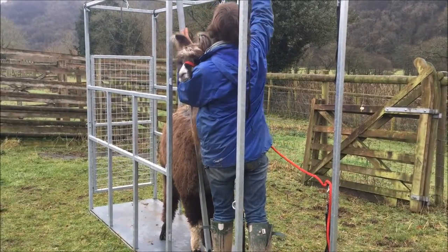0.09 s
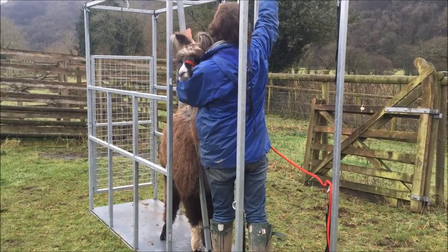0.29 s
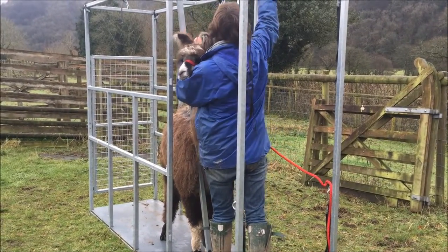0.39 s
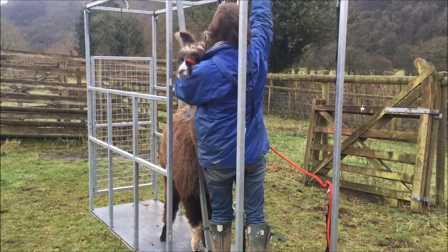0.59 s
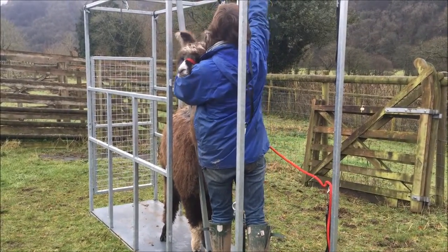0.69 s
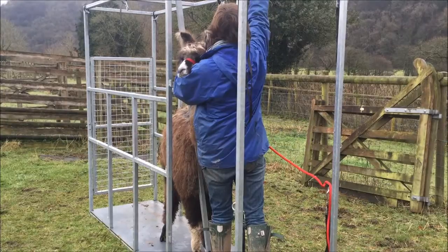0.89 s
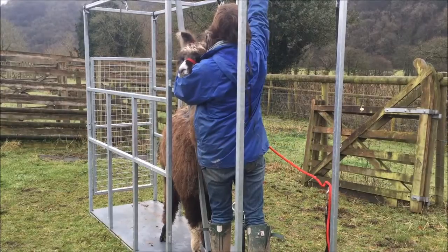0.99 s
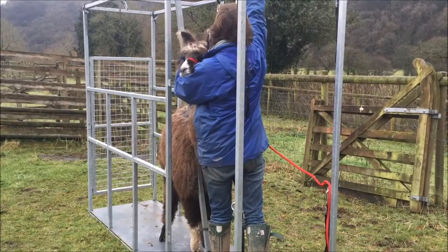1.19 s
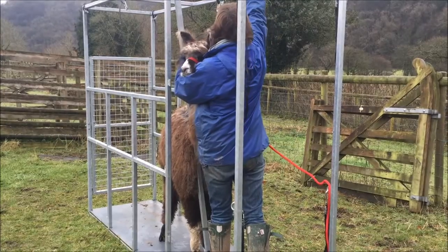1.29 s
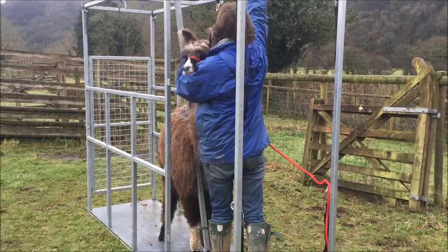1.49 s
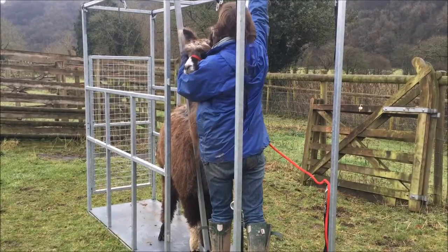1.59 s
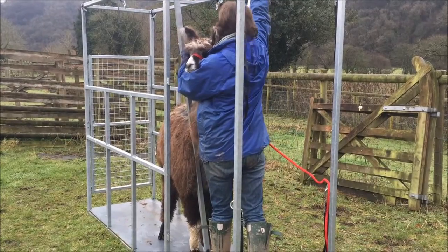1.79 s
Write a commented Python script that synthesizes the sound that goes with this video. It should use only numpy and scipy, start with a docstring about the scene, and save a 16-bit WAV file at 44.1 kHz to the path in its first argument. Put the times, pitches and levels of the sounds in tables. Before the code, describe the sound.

A steel bar scrapes briefly, slams with a hard bright clank and clatters back, the tubular frame ringing on; later soft knocks and a dull scrape with a faint squeal, in a breezy open field, close microphone.

```python
"""A field with a galvanised steel livestock chute, an animal shifting inside: breeze and far-off bird behind.
A bar scrapes along, slams home and clatters back; a cluster of pure tones swells with the slam and fades, and
the frame rings on. Light knocks and a duller scrape with a thin squeal follow. Steel is random contact impulses
through coloured filters and decaying sine modes; the breeze is filtered noise, the bird falling sine whistles."""
import sys
import numpy as np
from scipy import signal
from scipy.io import wavfile
from scipy.ndimage import uniform_filter1d

SR = 44100
rng = np.random.default_rng(int(sys.argv[2]) if len(sys.argv) > 2 else 0)


def wrap_up_sound(samples):
    """Save the sound to the file named by the first command line argument, as 16-bit audio."""
    columns = np.atleast_2d(samples).T
    # keep every value between -1 and 1, then stretch to whole-number steps
    tamed = np.clip(columns, -1, 1)
    steps = np.round(tamed * 32767).astype(np.int16)
    wavfile.write(sys.argv[1], SR, steps)


N = 79380
T = np.arange(N) / SR
HZ = np.fft.rfftfreq(4096, 1 / SR)
SLIPS_PER_S, SLIP_SPREAD_DB = 2800, 3

# Steel-on-steel blows: start_s, rise_s, hold_s, release_t60_s, level_db, rest_after_s
SLAM_BLOW = (.2166, .002, .009, .06, -13.3, .0205)
REBOUND_BLOW = (.246, .010, .007, .14, -22.3, .081)
# Short resonances of the struck parts: resonance_hz, slam_lift_db, rattle_lift_db
PART_RESONANCES = [(355, 9, 8), (680, 13, 13), (1635, 2, 7), (1895, 10, 2), (2385, 7, 10), (2860, 7, 1),
                   (3315, 6, 12), (3720, 9, 10), (4870, 2, 9), (5280, 11, 8), (5870, 10, 0), (6930, 8, 9),
                   (7410, 10, 10), (7960, 5, 10), (8440, 11, 9), (9590, 11, 9), (9810, 8, 2)]
# Frame modes: mode_hz, struck_level_db, struck_t60_s, scraped_relative_db
FRAME_MODES = [(163, -44, .5, -2), (366, -45, .55, -1), (411, -55, 1.3, -7), (590, -47, .3, -6),
               (974, -54, .5, 2), (1100, -58, .25, 3), (1236, -48, .4, 2), (1330, -44, .47, -10),
               (2051, -52, .2, 2), (2719, -42, .46, -20), (3219, -48, .42, -3), (3424, -54, .3, -5),
               (6660, -50, .5, -19), (6729, -49, .65, -17), (9448, -45, .38, -21), (9708, -51, .35, -17),
               (10401, -50, .4, -34)]


def amp(db):
    """Decibels to gain."""
    return 10 ** (np.asarray(db) / 20)


def unit(x):
    """Scales to rms 1."""
    return x / np.sqrt(np.mean(x ** 2) + 1e-20)


def read(points):
    """Spectrum in dB, interpolated on a log-frequency axis."""
    hz, db = np.transpose(points)
    return np.interp(np.log(HZ + 1), np.log(hz + 1), db)


def level(points):
    """Level curve (s, dB) as gain over the whole scene."""
    return amp(np.interp(T, *np.transpose(points)))


def colour(x, db):
    """Causal minimum-phase filter of energy 1: only the shape of the spectrum counts."""
    log_gain = np.log(amp(np.maximum(db - db.max(), -90)))
    mirrored = np.r_[log_gain, log_gain[-2:0:-1]]
    taps = np.fft.ifft(np.exp(np.conj(signal.hilbert(mirrored)))).real
    return signal.fftconvolve(x, taps / np.linalg.norm(taps))[:N]


def peak(hz, width_hz, db):
    """Lift in dB of one resonance."""
    return db / (1 + (2 * (HZ - hz) / width_hz) ** 2)


def crowded(depth_db):
    """Many close modes of a welded frame, as a random ripple on a spectrum in dB."""
    ripple = uniform_filter1d(rng.standard_normal(len(HZ)), size=4)
    return depth_db * np.tanh(unit(uniform_filter1d(ripple, size=3)))


def flutter(depth_db):
    """Gain that wavers at random."""
    waver = uniform_filter1d(rng.standard_normal(N), size=400)
    return amp(depth_db * unit(uniform_filter1d(waver, size=300)))


def contacts(per_s, spread_db):
    """Dense random train of tiny impacts of uneven size and random sign, rms 1."""
    size = amp(spread_db * np.minimum(rng.exponential(1, N), 3))
    sign = rng.choice([-1, 1], N)
    return unit(size * sign * (rng.random(N) < per_s / SR))


def decay(t_s, t60_s):
    """Exponential decay by 60 dB in t60_s."""
    return np.exp(-np.log(1000) * t_s / t60_s)


def envelope(start_s, rise_s, hold_s, t60_s, db):
    """Linear attack, hold and exponential release."""
    t = T - start_s
    return np.clip(t / rise_s, 0, 1) * amp(db) * decay(np.maximum(t - rise_s - hold_s, 0), t60_s)


def tone(hz):
    """One mode: a sine at random phase."""
    return np.sin(2 * np.pi * (hz * T + rng.random()))


def field():
    """Breeze: faint open-air hiss and an uneven low rumble, both filtered noise."""
    # Spectra: frequency_hz, relative_density_db_per_hz
    air_colour = [(100, -5), (170, -3), (260, -10), (420, -10), (520, -15), (950, -11.5), (1500, -14),
                  (3200, -23.5), (5000, -27.5), (15500, -36)]
    rumble_colour = [(20, -36), (35, -14), (55, 0), (110, -5), (170, -7), (240, -18), (500, -34),
                     (3000, -85)]
    # Rumble level: time_s, level_db
    rumble_level = [(0, -54), (.13, -60), (.28, -51), (.52, -56), (.58, -63), (.745, -65), (.775, -55),
                    (1.0, -57), (1.09, -63), (1.13, -58), (1.28, -57), (1.34, -65), (1.8, -61)]
    air_db = -64.5
    air = amp(air_db) * colour(rng.standard_normal(N), read(air_colour))
    return air + level(rumble_level) * colour(rng.standard_normal(N), read(rumble_colour))


def bird(waver=.016):
    """Thin whistles that swell, fall in pitch and fade."""
    # Whistles: start_s, length_s, start_hz, end_hz, level_db
    whistles = [(.87, .1, 7400, 6150, -68), (1.005, .065, 3650, 3100, -69), (1.035, .1, 7400, 5500, -69),
                (1.198, .1, 6850, 5400, -71)]
    bend = 1.15  # above 1, the fall steepens towards the end
    out = np.zeros(N)
    for start_s, length_s, from_hz, to_hz, db in whistles:
        u = np.clip((T - start_s) / length_s, 0, 1)
        glide_hz = from_hz + (to_hz - from_hz) * u ** bend
        wobble = unit(uniform_filter1d(rng.standard_normal(N), size=120))
        hz = glide_hz * (1 + waver * wobble)
        swell = amp(db) * flutter(depth_db=2.5) * np.sin(np.pi * u)
        out += swell * np.sin(2 * np.pi * np.cumsum(hz) / SR)
    return out


def knocks():
    """Small bumps against the chute, each favouring one resonance."""
    # Bumps: start_s, rise_s, hold_s, release_t60_s, level_db, resonance_hz, width_hz, lift_db
    bumps = [(1.173, .005, .01, .09, -55, 3500, 1900, 15), (1.192, .012, .02, .14, -56, 400, 220, 23),
             (1.193, .008, .015, .13, -60, 1400, 140, 19), (1.5932, .0005, .002, .08, -43.5, 1100, 900, 12),
             (1.708, .012, .01, .09, -51.5, 900, 1600, 5)]
    # Spectrum: frequency_hz, relative_density_db_per_hz
    bump_colour = [(100, -8), (400, -2), (1200, -3), (2200, -7), (4200, -15), (5200, -27), (15000, -44)]
    out = np.zeros(N)
    for *shape, hz, width_hz, lift_db in bumps:
        impacts = contacts(SLIPS_PER_S, SLIP_SPREAD_DB) * envelope(*shape)
        out += colour(impacts, read(bump_colour) + peak(hz, width_hz, lift_db))
    return out


def squeal():
    """The second scrape sings thinly, as one wavering tone, while it presses hardest."""
    # Shape: start_s, rise_s, hold_s, release_t60_s, level_db
    squeal_shape = (1.535, .03, .135, .1, -68)
    return tone(hz=4545) * envelope(*squeal_shape) * flutter(depth_db=2)


def scrape(force, spectrum, ring_db, tilt_db_per_octave, ring_t60_s, bite):
    """Tiny slips rasp and excite the damped frame; more bite makes it ring only when pressed hard."""
    push = level(force)
    slips = contacts(SLIPS_PER_S, SLIP_SPREAD_DB) * push
    modes = sum(amp(db + tilt_db_per_octave * np.log2(hz)) * tone(hz) for hz, _, _, db in FRAME_MODES)
    ring = modes * decay(T, ring_t60_s)
    drive = slips * (push / push.max()) ** bite
    ringing = signal.fftconvolve(drive, ring / np.linalg.norm(ring))[:N]
    rasp = colour(slips, read(spectrum) + crowded(depth_db=5.5))
    return rasp + amp(ring_db) * ringing


def scrapes():
    """The bar scrapes in before the slam; a duller scrape comes later."""
    # Force: time_s, level_db
    in_force = [(.085, -84), (.123, -56), (.143, -57), (.167, -47.5), (.183, -51), (.197, -47), (.215, -46),
                (.25, -100)]
    back_force = [(1.25, -76), (1.47, -65), (1.52, -56), (1.56, -54), (1.615, -51.5), (1.655, -53),
                  (1.69, -58), (1.8, -57)]
    # Spectra: frequency_hz, relative_density_db_per_hz
    in_colour = [(50, -20), (200, -7), (375, 1), (524, -8), (760, -2), (2700, -13), (3600, -9), (5040, -23),
                 (15000, -35)]
    back_colour = [(60, -20), (165, -1), (240, -7), (340, 1), (550, -6), (720, 2), (1100, -1), (1500, -8),
                   (2100, -7), (2750, -17), (5150, -31), (8500, -29), (15000, -43)]
    return (scrape(in_force, in_colour, ring_db=-9, tilt_db_per_octave=6, ring_t60_s=.07, bite=0)
            + scrape(back_force, back_colour, ring_db=2, tilt_db_per_octave=0, ring_t60_s=.13, bite=.5))


def frame():
    """From the rebound the tubes ring on unevenly and the floor plate shudders dully."""
    # Floor plate: start_s, rise_s, hold_s, release_t60_s, level_db
    shudder = (.252, .03, .05, .33, -45)
    # Spectrum: frequency_hz, relative_density_db_per_hz
    shudder_colour = [(30, -18), (70, -3), (150, 1), (250, -10), (400, -4), (680, -16), (1400, -13),
                      (3000, -26), (14000, -55)]
    rise_s, flutter_db = .018, 2.8
    ring = sum(tone(hz) * flutter(flutter_db) * envelope(REBOUND_BLOW[0], rise_s, 0, t60_s, db)
               for hz, db, t60_s, _ in FRAME_MODES)
    return ring + colour(rng.standard_normal(N) * envelope(*shudder), read(shudder_colour))


def pure_tones():
    """A cluster of pure steady tones swells with the slam and fades quickly under the rebound."""
    # Tones: tone_hz, level_db
    tone_levels = [(2990, -29), (3247, -29), (3305, -27), (3768, -23), (3812, -26), (4785, -33),
                   (6343, -33), (6849, -32), (9505, -32)]
    rise_s, slow_t60_s, fade_after_s, fade_t60_s = .008, .6, .042, .055
    swell = envelope(SLAM_BLOW[0], rise_s, 0, slow_t60_s, 0)
    fade = envelope(SLAM_BLOW[0], 1 / SR, fade_after_s, fade_t60_s, 0)
    return swell * fade * sum(amp(db) * tone(hz) for hz, db in tone_levels)


def clatter(blow, spectrum, lifts_db, ripple_db):
    """Steel chatters on steel through the parts' short resonances; coming to rest damps them."""
    chatter_per_s, spread_db, settle_s, resting_db, width_hz = 12000, 1.2, .003, -23, 70
    *shape, rest_after_s = blow
    damping = np.clip((blow[0] + rest_after_s - T) / settle_s, amp(resting_db), 1)
    resonances = sum(peak(row[0], width_hz, db) for row, db in zip(PART_RESONANCES, lifts_db))
    body = read(spectrum) + resonances + crowded(ripple_db)
    return damping * colour(contacts(chatter_per_s, spread_db) * envelope(*shape), body)


def clank():
    """The bar slams home, clatters back, and after a short rest rattles once more, weak and dull."""
    # Blow: start_s, rise_s, hold_s, release_t60_s, level_db, rest_after_s
    last_rattle = (.338, .008, .012, .22, -49, .12)
    # Spectra: frequency_hz, relative_density_db_per_hz
    slam_colour = [(100, -33), (300, -24), (660, -19), (1060, -22), (1380, -11), (2700, -10), (3700, -5),
                   (4400, -10), (5500, -18), (7000, -15), (10000, -17), (15500, -26)]
    rebound_colour = [(50, -25), (120, -12), (550, -14.5), (980, -9.5), (1700, -7.5), (3250, -7),
                      (4560, -14), (8200, -13), (12000, -16), (15500, -23)]
    rattle_colour = [(700, -10), (2600, 0), (3700, -5), (4600, -19), (9000, -17), (15000, -27)]
    _, slam_db, rattle_db = np.transpose(PART_RESONANCES)
    return (clatter(SLAM_BLOW, slam_colour, slam_db, ripple_db=1)
            + clatter(REBOUND_BLOW, rebound_colour, rattle_db, ripple_db=3)
            + clatter(last_rattle, rattle_colour, rattle_db, ripple_db=4))


def scene():
    """The field, the bird and the chute, as one channel."""
    background = field() + bird()
    chute = knocks() + squeal() + scrapes() + frame() + pure_tones() + clank()
    return (background + chute)[None]


def record(dry):
    """The loudest peaks are rounded off; then the recorder's band limit."""
    overload, edge_hz = .75, 15900  # overload: amplitude towards which peaks are rounded
    rounded = overload * np.tanh(dry / overload)
    lowpass = signal.firwin(511, edge_hz, window=("kaiser", 9), fs=SR)
    return signal.oaconvolve(rounded, lowpass[None], "same")


dry = scene()
out = record(dry)
wrap_up_sound(out)
```